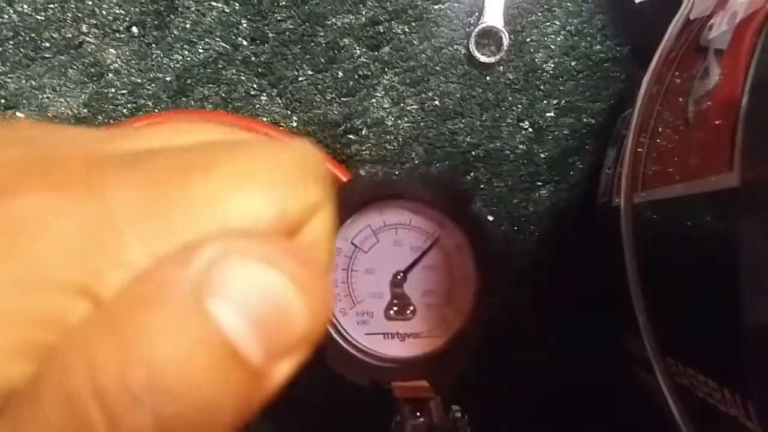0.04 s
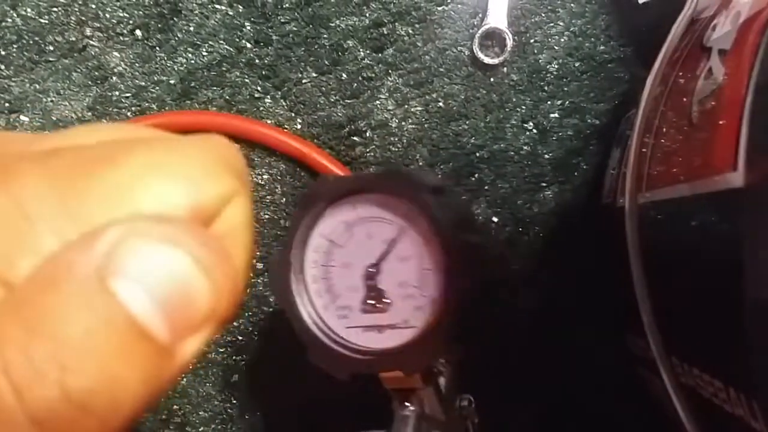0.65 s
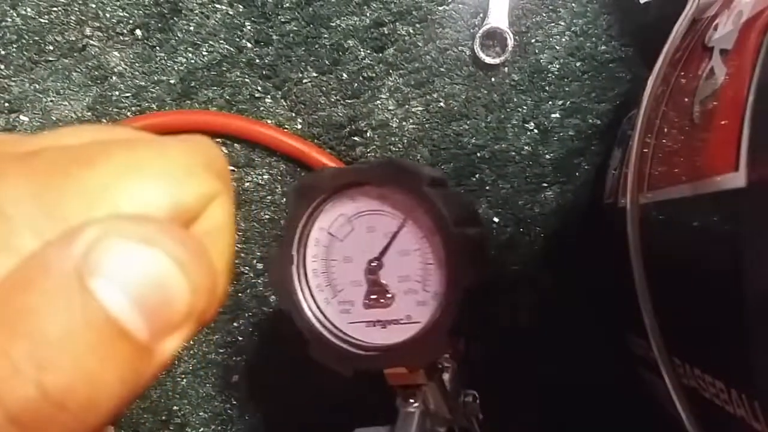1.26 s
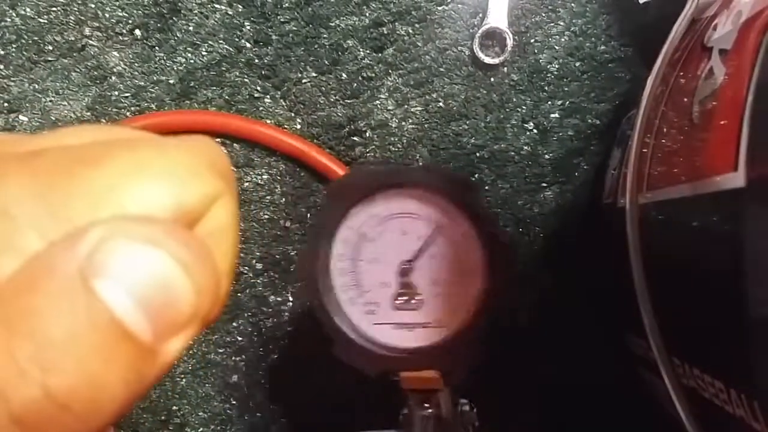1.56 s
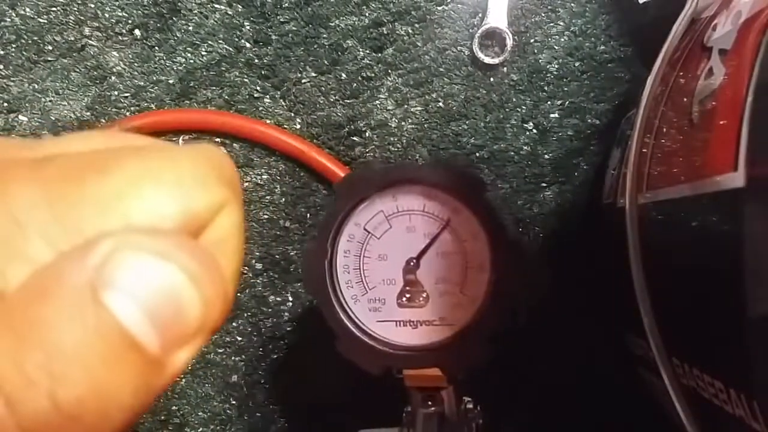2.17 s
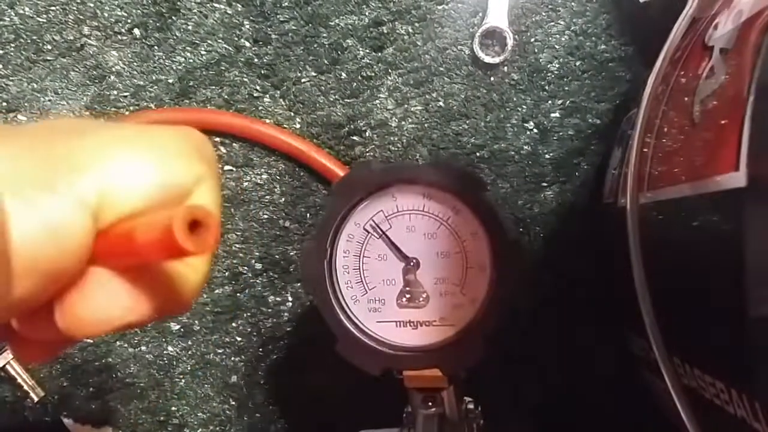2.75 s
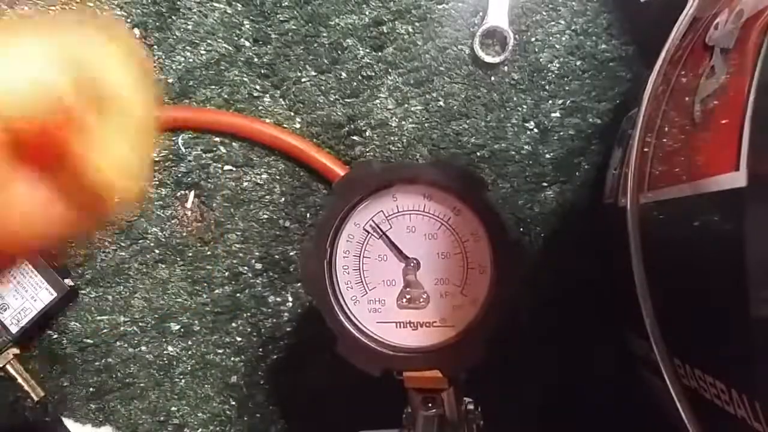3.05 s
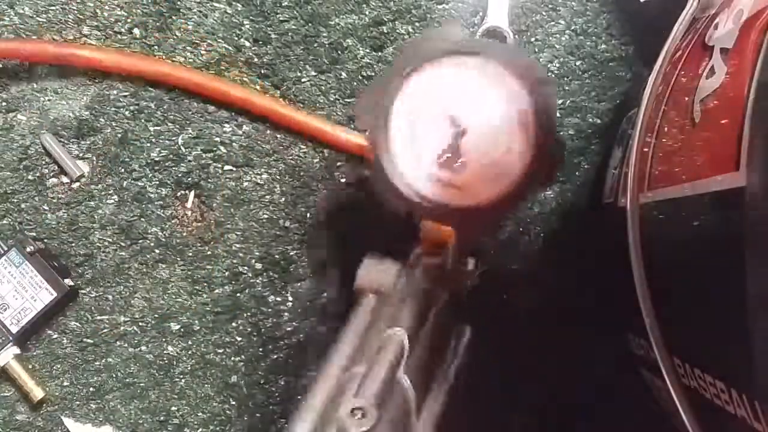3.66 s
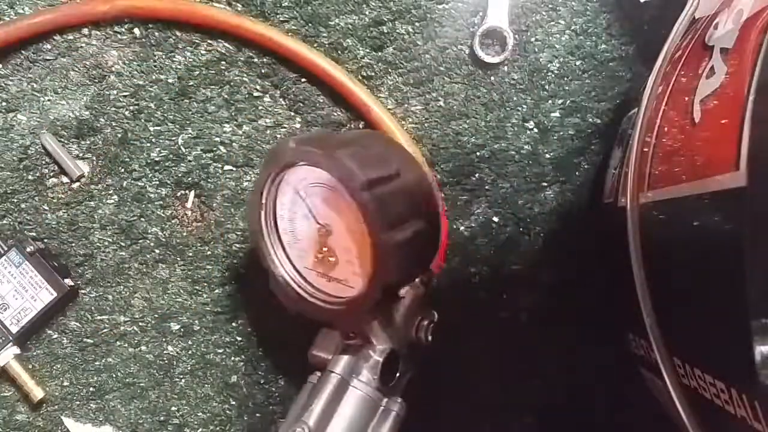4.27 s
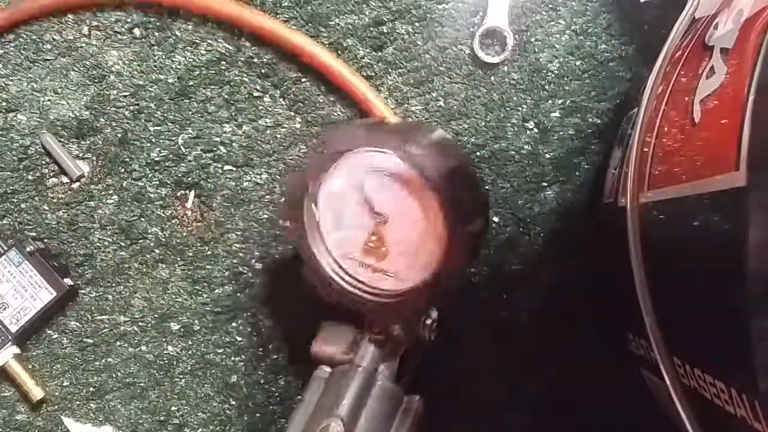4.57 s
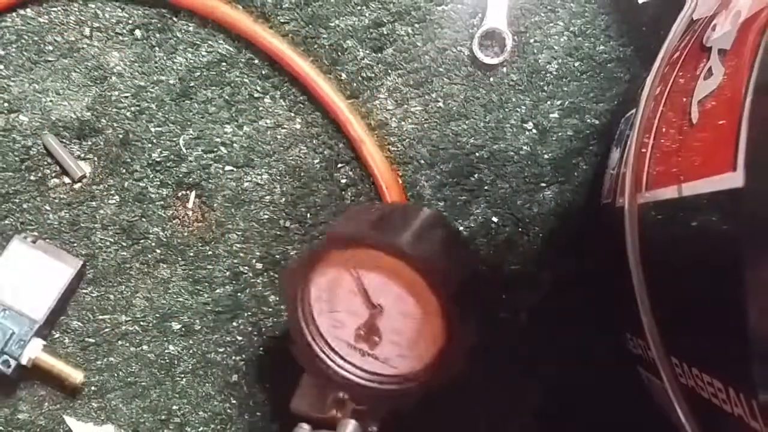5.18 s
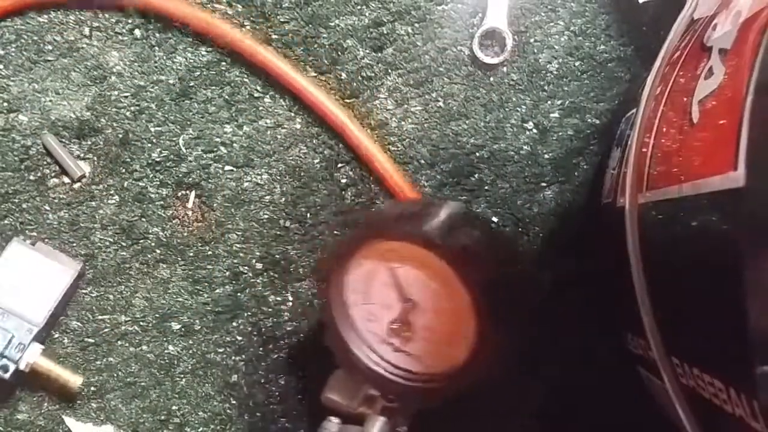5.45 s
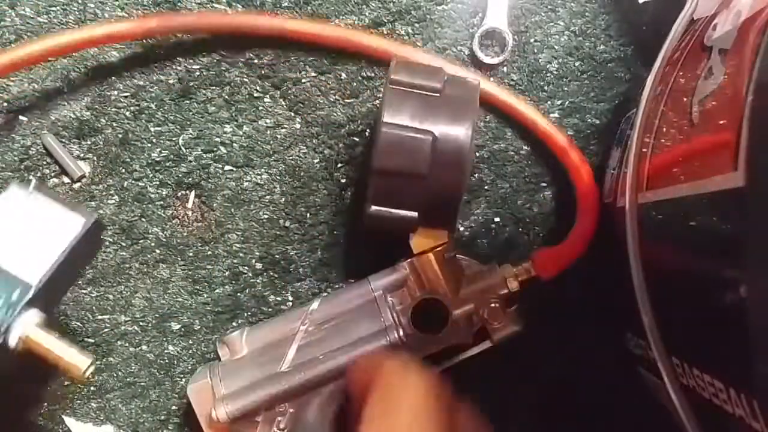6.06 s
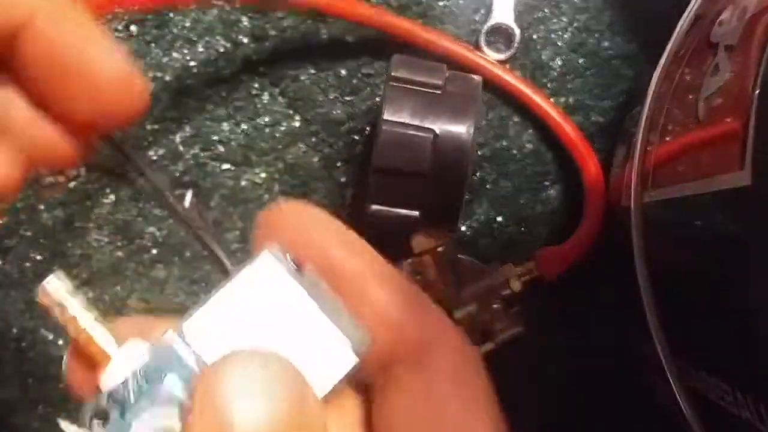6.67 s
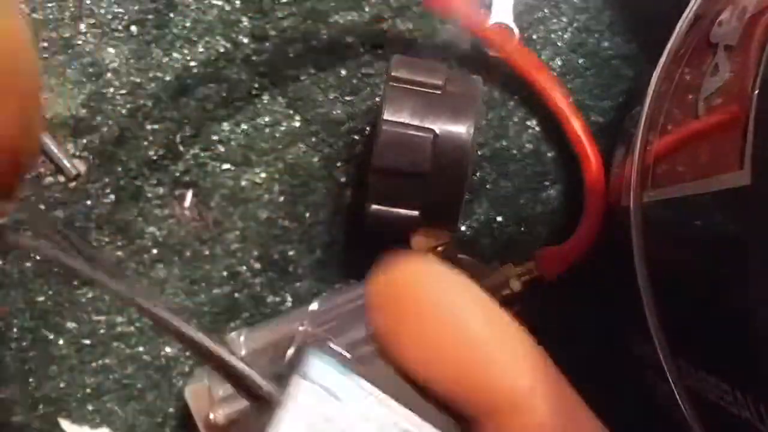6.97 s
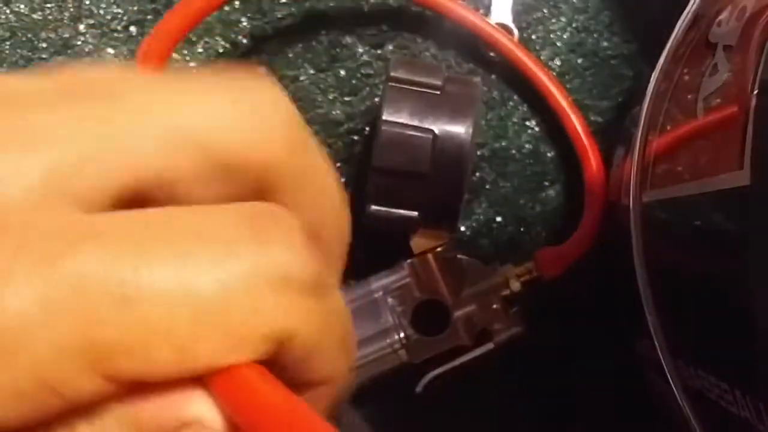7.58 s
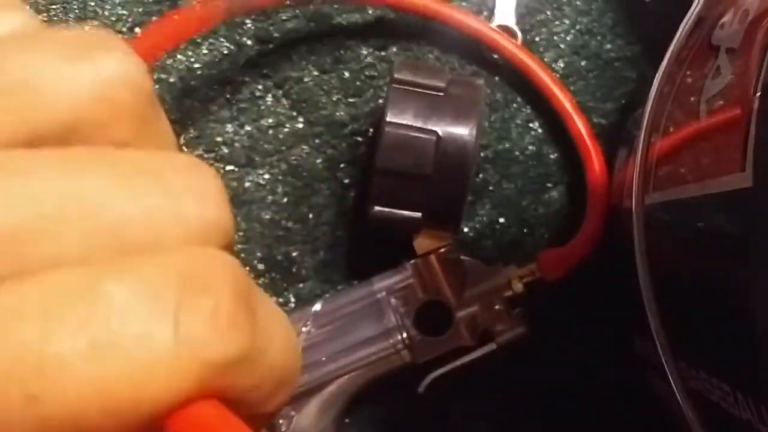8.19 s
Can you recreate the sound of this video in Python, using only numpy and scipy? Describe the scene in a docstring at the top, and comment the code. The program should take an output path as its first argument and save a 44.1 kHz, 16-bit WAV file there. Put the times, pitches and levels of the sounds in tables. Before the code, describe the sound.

For the first two seconds, a faint, high, fluttering air leak sounds over low room rumble, microphone hiss and a thin whine. At about 2.4 seconds a hose is released with a sharp pop and a very short jet, followed by a hiss that dies away by 3 seconds. From 3.3 seconds the hose swishes and scuffs over a bench mat. A metal hand tool with a gauge knocks and clicks on the workbench at about 3.7 and 4 seconds, then rubs and clicks more lightly between 4.6 and 4.9. Around 5.8 seconds it topples with a heavy thud and a quick metallic clatter, rocking to rest in small ticks by 6.1. Soft brushing and two faint ticks follow as hands pick up a small valve, fading by 7.5 seconds and leaving the room rumble. Everything is close, and brighter on the left.

```python
"""A workshop bench with a mat. A thumb seals a pressurised air hose while the fittings leak faintly,
then lets go: a pop, a short jet, a dying hiss. The hose is dragged over the mat; its metal inflator
and gauge rub, knock and click on the bench, then topple and rock to rest. Hands pick up a small valve.
The room rumbles behind two close microphones, the left one much brighter."""
import sys
import numpy as np
from scipy import signal
from scipy.fft import rfft, irfft, next_fast_len
from scipy.io import wavfile
from scipy.ndimage import map_coordinates

SR = 44100
rng = np.random.default_rng(int(sys.argv[2]) if len(sys.argv) > 2 else 0)


def log_audio(samples):
    """Write samples as a 16-bit WAV file to the path given in sys.argv[1]."""
    # one column per channel
    frames = np.atleast_2d(samples).T
    # limit to full scale, then quantise
    limited = np.clip(frames, -1, 1)
    pcm = np.round(limited * 32767).astype(np.int16)
    wavfile.write(sys.argv[1], SR, pcm)


N = 366912
TIME = np.arange(N) / SR
RELEASE_S = 2.3512   # the thumb lets go


def from_db(db):
    """Decibels to gain."""
    return 10 ** (np.asarray(db) / 20)


def bin_gains(spectrum, size):
    """Gain per FFT bin for each dB column, interpolated over log frequency."""
    hz, *columns = np.transpose(spectrum)
    grid = np.log(np.fft.rfftfreq(size, 1 / SR) + 1)
    return from_db([np.interp(grid, np.log(hz), db) for db in columns])


def colour(x, spectrum):
    """Minimum-phase filter, one channel per dB column."""
    size = next_fast_len(N + SR // 2, real=True) * 2
    cepstrum = irfft(np.log(bin_gains(spectrum, size)))
    cepstrum[:, 1:size // 2] *= 2
    cepstrum[:, size // 2 + 1:] = 0
    return irfft(rfft(x, size) * np.exp(rfft(cepstrum)))[:, :N]


def noise(spectrum):
    """Steady noise of the given density, one channel per dB column."""
    size = next_fast_len(N, real=True)
    density = bin_gains(spectrum, size) * np.sqrt(SR / 2)
    white = rng.standard_normal((len(density), size))
    return irfft(rfft(white) * density, size)[:, :N]


def drift(rate_hz):
    """Smooth random curve, spread near 1."""
    return np.interp(TIME * rate_hz, np.arange(N), rng.standard_normal(N))


def decay(age_s, t60_s):
    """Exponential fall, 60 dB in t60_s."""
    return np.exp(-np.log(1000) * age_s / t60_s)


def envelope(start_s, attack_s, hold_s, t60_s):
    """Swell, hold, decay."""
    age_s = TIME - start_s
    swell = np.clip(age_s / attack_s, 0, 1) ** 2
    return swell * decay(np.maximum(age_s - attack_s - hold_s, 0), t60_s)


def resonate(x, hz, t60_s):
    """Two-pole resonance, unity peak gain."""
    radius = decay(1 / SR, t60_s)
    zeros = np.array([1, 0, -1]) * (1 - radius ** 2) / 2
    poles = [1, -2 * radius * np.cos(2 * np.pi * hz / SR), radius ** 2]
    return signal.lfilter(zeros, poles, x + 1e-18)


def air_band(hz, width_hz, left_db, right_db):
    """Rushing air sings in one steep-sided resonance."""
    t60_s = np.log(1000) / (np.pi * width_hz)
    white = rng.standard_normal((2, N)) * np.sqrt(SR / 2)
    return from_db([[left_db], [right_db]]) * resonate(resonate(white, hz, t60_s), hz, t60_s)


def contact(fade_s, grit):
    """Stereo impulse plus a burst of roughness; grit is the burst's share of the energy."""
    t = TIME[:SR // 20]
    burst = np.exp(-t / fade_s) * rng.standard_normal((2, len(t)))
    impulse = np.sqrt((1 - grit) * fade_s * SR / 2) * (t == 0)
    return np.sqrt(grit) * burst + impulse


def placed(start_s, sound):
    """A short sound on a silent stereo track."""
    out, start = np.zeros((2, N)), int(start_s * SR)
    out[:, start:start + sound.shape[-1]] = sound
    return out


def lowpass(x, hz, order):
    """Butterworth low-pass."""
    return signal.sosfilt(signal.butter(order, hz, fs=SR, output="sos"), x)


def workshop(x, wet_db, t60_s, wall_hz):
    """Adds dense, dull reflections, different at each microphone."""
    t = TIME[:SR // 2]
    build_up = 1 - np.exp(-t / 0.0015)
    tail = rng.standard_normal((2, len(t))) * decay(t, t60_s) * build_up
    tail /= np.sqrt(np.sum(tail ** 2, axis=1, keepdims=True))
    tail = lowpass(tail, wall_hz, order=1)
    return x + from_db(wet_db) * signal.fftconvolve(np.atleast_2d(x), tail, axes=1)[:, :N]


# Room rumble. Each row: frequency in Hz, density in dB/Hz.
ROOM_RUMBLE = [(20, -112), (35, -93.5), (60, -75.5), (85, -77), (125, -77), (165, -86.5), (235, -83),
               (320, -93.5), (550, -95.5), (1100, -104), (3000, -120)]
# Microphone hiss. Each row: frequency in Hz, left and right density in dB/Hz.
MIC_HISS = [(30.2, -104, -104), (89, -99, -87.5), (460, -96, -99), (1016, -100, -93), (1520, -104, -100),
            (2060, -94.5, -101), (2690, -107, -107), (3880, -104, -106), (6000, -99, -108),
            (8100, -107, -107), (13300, -108, -107), (14200, -108, -102)]
# Electronic whine, left then right. Each row: frequency in Hz, RMS level in dB.
MIC_WHINE = [(13700, -70), (13995, -60)]


def background(waver_hz=30):
    """Room rumble common to both sides; each microphone adds its own hiss and wavering whine."""
    whine = []
    for hz, db in MIC_WHINE:
        cycles = np.cumsum(hz + waver_hz * drift(120)) / SR
        whine.append(from_db(db) * np.sqrt(2) * np.sin(2 * np.pi * cycles))
    return noise(ROOM_RUMBLE) + noise(MIC_HISS) + np.array(whine)


# Leak whistles. Each row: centre in Hz, width in Hz, left and right density in dB/Hz.
LEAK_BANDS = [(5010, 860, -101, -98.5), (5870, 220, -101, -115), (8120, 1600, -116, -96),
              (10050, 990, -112, -95), (11370, 700, -114, -97.5), (15400, 3100, -114, -90.5)]


def leak(flutter_db=2.5, fade_db_per_s=0.9):
    """Air sings in narrow gaps at the fittings; the fluttering bands fade once the hose is open."""
    whistle = sum(air_band(*band) * from_db(flutter_db * drift(25)) for band in LEAK_BANDS)
    return whistle * from_db(-fade_db_per_s * np.maximum(TIME - RELEASE_S, 0))


# Steps of the seal opening. Each row: delay in seconds, crack gain in dB, air slug peak in dB,
# slug width in seconds.
SEAL_POPS = [(0, 8, -24.5, 0.00046), (.0032, 4, -18.5, 0.0014)]
# Low boom and brief ring near 4 kHz after the pop. Each row: frequency in Hz,
# left and right level in dB, T60 in seconds.
POP_RINGS = [(86, -17.5, -21, 0.061), (3950, -6.5, -28, 0.014)]
# Jet at unit flow. Each row: frequency in Hz, left and right density in dB/Hz.
JET_SPECTRUM = [(130, -57, -74), (730, -73, -87), (1000, -59.5, -61), (1400, -66, -77.5),
                (3320, -65.5, -75), (4020, -63.5, -67), (4370, -59, -70), (5420, -46, -71),
                (6200, -47.5, -75), (7600, -57, -75), (11700, -62, -61), (15600, -68, -66)]


def pop_and_jet(jet_db=-3.5, attack_s=0.0061, crack_s=0.00126):
    """Stored pressure pops twice as the thumb lifts, with a low boom, a brief ring and a short jet."""
    flow = from_db(jet_db) * envelope(RELEASE_S - attack_s, attack_s, hold_s=0.022, t60_s=0.031)
    slugs = rings = 0
    for delay_s, crack_db, slug_db, slug_s in SEAL_POPS:
        age_s = TIME - RELEASE_S - delay_s
        crack = from_db(crack_db) * np.exp(-(age_s / crack_s) ** 2)
        flow = np.hypot(flow, crack)
        swing = age_s / slug_s
        slugs += from_db(slug_db) * swing * np.exp((1 - swing ** 2) / 2)
    ring_age_s = np.maximum(TIME - RELEASE_S + crack_s / 2, 0)
    for hz, left_db, right_db, t60_s in POP_RINGS:
        ring = decay(ring_age_s, t60_s) * np.sin(2 * np.pi * hz * ring_age_s)
        rings += from_db([[left_db], [right_db]]) * ring
    return workshop(noise(JET_SPECTRUM) * flow + slugs + rings, wet_db=-16, t60_s=0.35, wall_hz=7000)


# Emptying hose at unit flow. Each row: centre in Hz, width in Hz, left and right density in dB/Hz.
DRAIN_BANDS = [(950, 1500, -84.5, -89), (1630, 220, -83.5, -86), (2160, 540, -75.5, -75.5),
               (3240, 650, -72, -85), (3690, 580, -73.5, -88), (5490, 500, -70, -86.5),
               (5950, 750, -72.5, -97.5), (10500, 4000, -89, -92)]


def drain(gain_db=2, flutter_db=1.2, sag_per_s=0.064, empty_s=3.03, taper_s=0.21):
    """Flow dies with the pressure; the hose's resonances flutter and sink as the air slows and cools."""
    flow = from_db(gain_db) * envelope(RELEASE_S, attack_s=0.036, hold_s=0.018, t60_s=1.21)
    flow *= np.clip((empty_s - TIME) / taper_s, 0, 1)
    rush = sum(air_band(*band) * from_db(flutter_db * drift(40)) for band in DRAIN_BANDS)
    pitch_ratio = 1 - sag_per_s * np.clip(TIME - RELEASE_S, 0, empty_s - RELEASE_S)
    return flow * np.array([map_coordinates(side, [np.cumsum(pitch_ratio)]) for side in rush])


def stroke(start_s, length_s, roundness):
    """A slide speeds up and slows down; loudness follows speed."""
    progress = np.clip((TIME - start_s) / length_s, 0, 1)
    return (4 * progress * (1 - progress)) ** roundness


def stick_slip(rate_hz=150, rate_spread=0.3, judder_db=3):
    """Rubber sticks and lets go in an uneven train of jerks, near unit density."""
    slip_count = np.cumsum(rate_hz * np.exp(rate_spread * drift(rate_hz))) / SR
    jerks = np.diff(np.floor(slip_count), prepend=0) * from_db(judder_db * drift(rate_hz))
    return jerks * SR / np.sqrt(2 * rate_hz)


# Slides over the mat. Each row: start and length in seconds, swish and scuff gain in dB.
MAT_STROKES = [(3.292, 0.064, 3.5, -11), (3.375, 0.44, 3.5, -9), (3.813, 0.27, 8.5, 2.5),
               (4.579, 0.16, 4.5, 4.5), (4.753, 0.18, 7, 8), (4.848, 0.32, 0.5, -14), (5.361, 0.83, 5, -20),
               (5.712, 0.26, 5.5, 6), (5.888, 0.466, -1, -11), (6.518, 0.074, 3.5, -7),
               (6.394, 1.08, -0.5, -9.5), (6.704, 0.065, -12, 4), (6.793, 0.22, 1.5, -8),
               (7.3, 0.06, 6.5, -16)]
# Brushed nap at unit gain. Each row: frequency in Hz, left and right density in dB/Hz.
SWISH_SPECTRUM = [(770, -112, -114), (2040, -108, -109), (4650, -102, -110), (6100, -93.5, -108),
                  (7700, -102, -110), (16100, -112, -112)]
# Bench under the mat at unit gain. Each row: frequency in Hz, density in dB/Hz.
SCUFF_SPECTRUM = [(120, -100), (300, -84.5), (400, -90.5), (520, -83.5), (660, -89.5), (5000, -130)]
# Rubs of the gauge's guard. Each row: start and length in seconds, gain in dB.
GUARD_RUBS = [(4.587, 0.15, 1), (4.764, 0.12, -11)]
# Rub filter. Each row: frequency in Hz, gain in dB.
RUB_FILTER = [(50, -108), (120, -63.5), (200, -58), (310, -62.5), (420, -76), (530, -67), (700, -79),
              (6000, -112)]


def dragging(grain_db=2, unevenness_db=2, scuff_grain_db=3):
    """Hose and hands swish over the mat; the gauge's rubber guard judders on the bench."""
    force = sum(from_db(db) * stroke(start_s, length_s, roundness=1)
                for start_s, length_s, db in GUARD_RUBS)
    rub = colour(stick_slip() * force, RUB_FILTER)
    swish_gain = scuff_gain = 0
    for start_s, length_s, swish_db, scuff_db in MAT_STROKES:
        speed = stroke(start_s, length_s, roundness=0.19)
        swish_gain = np.hypot(swish_gain, from_db(swish_db) * speed)
        scuff_gain = np.hypot(scuff_gain, from_db(scuff_db) * speed)
    nap = from_db(grain_db * drift(220) + unevenness_db * drift(25))
    swish = noise(SWISH_SPECTRUM) * swish_gain * nap
    scuff = noise(SCUFF_SPECTRUM) * scuff_gain * from_db(scuff_grain_db * drift(80))
    return rub + swish + scuff


def thud(start_s, db, hz, glide=2.8, glide_cycles=0.29, swell_cycles=0.62):
    """Bending wave in the bench top: higher tones arrive first, so the pitch drops."""
    out, start = np.zeros(N), int(start_s * SR)
    cycles = TIME[:SR // 4] * hz
    phase = cycles + glide * glide_cycles * (1 - np.exp(-cycles / glide_cycles))
    swell = cycles / swell_cycles
    out[start:start + len(cycles)] = from_db(db) * swell * np.exp(1 - swell) * np.sin(2 * np.pi * phase)
    return out


# Inflator bumps. Each row: start in seconds, envelope peak in dB, final pitch in Hz.
INFLATOR_KNOCKS = [(3.7411, -21.5, 168), (3.9591, -23, 157), (3.981, -40, 204), (4.670, -30, 163),
                   (4.793, -39, 282), (4.852, -44, 260), (5.8206, -17, 191), (5.8424, -17, 205),
                   (5.849, -9.5, 106), (5.8968, -31.5, 214)]
# Bench top modes. Each row: frequency in Hz, gain in dB, T60 in seconds.
BENCH_MODES = [(85.7, -5, 0.48), (118.4, 1, 0.3), (208.7, 4.5, 0.18), (283.5, 2, 0.16), (341, 4.5, 0.13),
               (428, -12, 0.14), (540, 2.5, 0.11), (598, 5.5, 0.18)]


def bench_knocks():
    """The inflator thuds on the bench and leaves the top ringing."""
    blows = sum(thud(*knock) for knock in INFLATOR_KNOCKS)
    rings = sum(from_db(db) * resonate(blows, hz, t60_s) for hz, db, t60_s in BENCH_MODES)
    return workshop(blows + rings, wet_db=-12, t60_s=0.36, wall_hz=2000)


# Metal contacts. Each row: start in seconds, relative click and ring level in dB, cutoff in Hz.
FITTING_CLICKS = [(3.7517, -11.5, -4, 8000), (3.762, -33, -24, 7560), (3.9846, -16, -13, 7000),
                  (4.0143, -18.5, -15, 10500), (4.3168, -32.5, -39, 15000), (4.4483, -23, -43, 7000),
                  (4.621, -24.5, -33, 6760), (4.64, -21.5, -25, 6500), (4.873, -19, -28, 8000),
                  (5.828, -12, -4.5, 10500), (5.8457, -12, -12, 9000), (5.849, -12.5, 0, 9000),
                  (5.854, -6.5, 2, 15500), (5.857, -10, -7, 11200)]
# Click filter. Each row: frequency in Hz, left and right gain in dB.
CLICK_FILTER = [(296, 2.5, 0), (1370, -10.5, -11), (2780, -10, -14), (3400, -7, -15), (4300, -1, -6),
                (5400, 5, -9), (6500, 1.5, -10), (8000, -2.5, -6), (10100, -3, 3.5)]
# Inflator body modes. Each row: frequency in Hz, left and right gain in dB.
INFLATOR_MODES = [(2000, -14.5, -26), (5300, -3, -20), (6820, -0.5, -26), (7940, 1.5, -14),
                  (10110, 1.5, -16), (14300, 3, -3)]


def fitting_clicks(click_gain_db=-2.5, ring_t60_s=0.021, ring_send=0.45):
    """Loose fittings click and ring the inflator's metal body, each contact with its own brightness."""
    taps = blows = 0
    for start_s, click_db, ring_db, cutoff_hz in FITTING_CLICKS:
        tap = lowpass(contact(fade_s=0.0017, grit=0.82), cutoff_hz, order=4)
        blow = lowpass(contact(fade_s=0.0044, grit=0.6), cutoff_hz, order=4)
        taps += placed(start_s, from_db(click_db) * tap)
        blows += placed(start_s, from_db(ring_db) * blow)
    clicks = from_db(click_gain_db) * colour(taps, CLICK_FILTER)
    rings = sum(from_db([[left_db], [right_db]]) * resonate(blows, hz, ring_t60_s)
                for hz, left_db, right_db in INFLATOR_MODES)
    in_room = workshop(clicks + ring_send * rings, wet_db=-3, t60_s=0.2, wall_hz=8600)
    return in_room + (1 - ring_send) * rings


# Lever, then valve, catching. Each row: start in seconds, tap level in dB, pitch in Hz.
CATCH_PINGS = [(3.7617, 1.5, 5360), (3.9777, -3, 6150), (3.9825, 0, 6260), (4.631, -17, 5700),
               (4.648, -15.5, 5640), (4.873, -5, 6200), (5.822, -15, 5800), (5.845, -1, 5900),
               (5.8573, 5, 6000), (5.899, -3, 6300), (6.535, -25, 2000), (6.936, -25.5, 5600)]


def catch_pings(t60_s=0.003, right_db=-23):
    """Small metal parts catch, each ringing one narrow, quickly damped resonance."""
    pings = 0
    for start_s, db, hz in CATCH_PINGS:
        tap = from_db(db) * contact(fade_s=0.0016, grit=0.29)
        pings += placed(start_s, resonate(resonate(tap, hz, t60_s), hz, t60_s))
    return workshop(pings * from_db([[0], [right_db]]), wet_db=-18, t60_s=0.16, wall_hz=9000)


# Gauge landings. Each row: start in seconds, relative tick level in dB, thump level in dB.
GAUGE_TICKS = [(5.8215, -27, -50), (5.8445, -19.5, -45), (5.9215, -33, -35), (5.9693, -37, -50),
               (5.9995, -33, -39), (6.0468, -36, -48), (6.0818, -44, -42)]
# Tick filter. Each row: frequency in Hz, gain in dB.
TICK_FILTER = [(150, -24), (450, -4), (900, 17.5), (1950, 12), (2900, -14), (12000, -45)]


def gauge_rocking(tick_gain_db=-2, thump_hz=270):
    """The gauge rocks to rest: its soft rubber ticks cleanly, its heavy side thumps the bench."""
    ticks = thumps = 0
    for start_s, tick_db, thump_db in GAUGE_TICKS:
        ticks += placed(start_s, from_db(tick_db + tick_gain_db) * contact(fade_s=0.00059, grit=0.08))
        thumps += thud(start_s, thump_db, thump_hz)
    return workshop(colour(ticks, TICK_FILTER) + thumps, wet_db=-8, t60_s=0.27, wall_hz=4000)


def shade_right(x, hz=560, t60_s=0.0045, depth=0.47):
    """The right microphone hears less of the bench's woody midrange."""
    left, right = x
    return np.array([left, right - depth * resonate(right, hz, t60_s)])


def scene(right_lag_s=0.0004):
    """Everything lies nearer the left microphone, so the right one lags."""
    air = leak() + pop_and_jet() + drain()
    bench = shade_right(bench_knocks() + dragging())
    hardware = fitting_clicks() + catch_pings() + gauge_rocking()
    left, right = air + bench + hardware + background()
    return np.array([left, np.interp(TIME - right_lag_s, TIME, right)])


def record(dry, highpass_hz=38, ceiling=0.85, lowpass_hz=15800):
    """Bass cut, soft clipping, steep treble cut."""
    thinned = signal.sosfilt(signal.butter(2, highpass_hz, "high", fs=SR, output="sos"), dry)
    rounded = ceiling * np.tanh(thinned / ceiling)
    return signal.sosfilt(signal.ellip(10, 0.1, 80, lowpass_hz, fs=SR, output="sos"), rounded)


dry = scene()
out = record(dry)
log_audio(out)
```